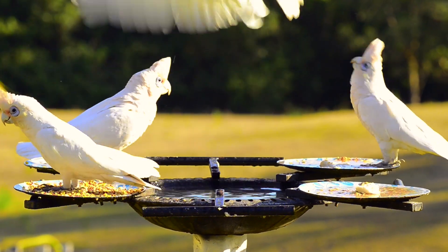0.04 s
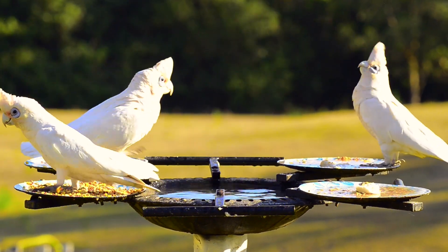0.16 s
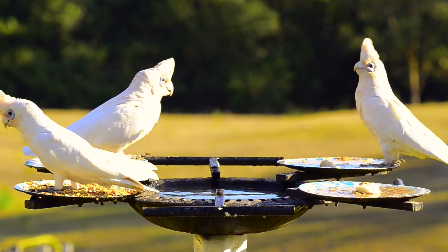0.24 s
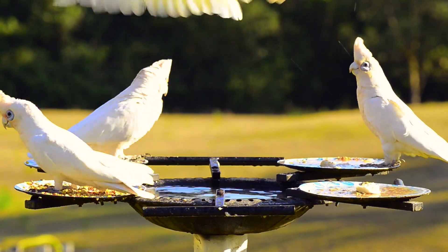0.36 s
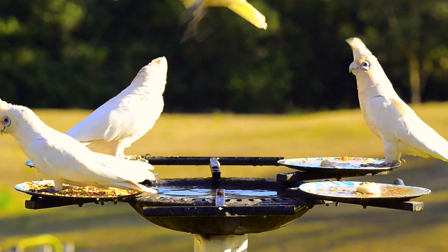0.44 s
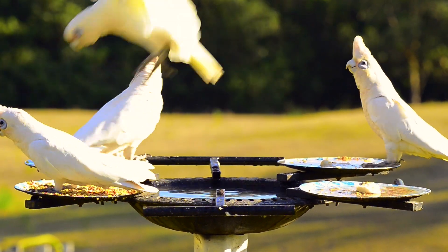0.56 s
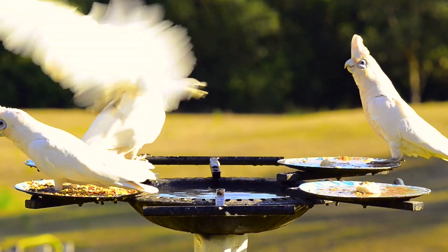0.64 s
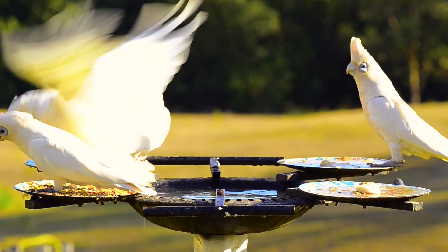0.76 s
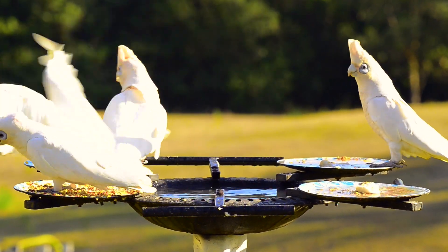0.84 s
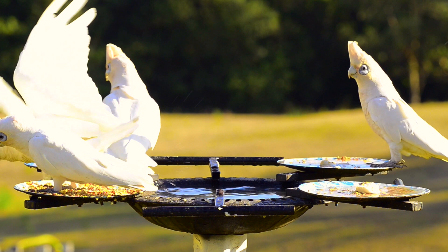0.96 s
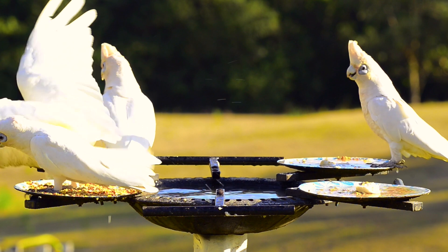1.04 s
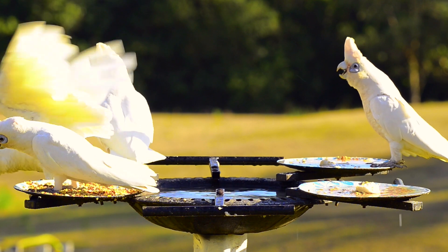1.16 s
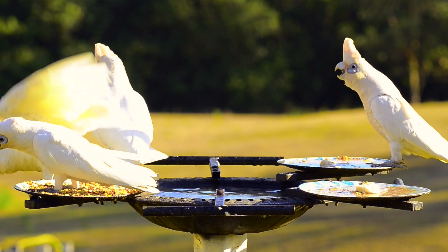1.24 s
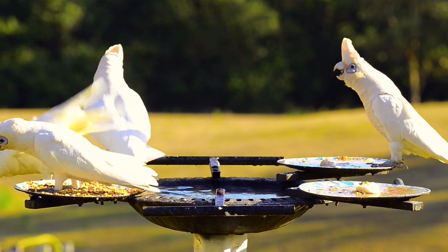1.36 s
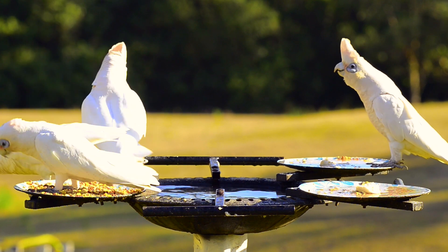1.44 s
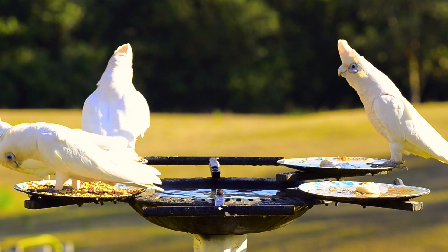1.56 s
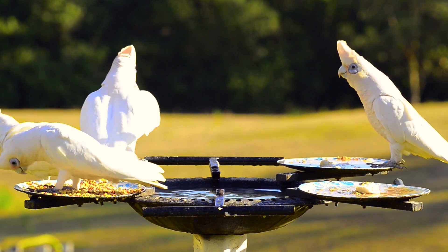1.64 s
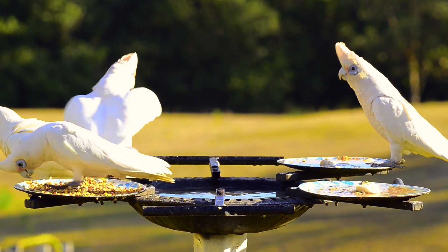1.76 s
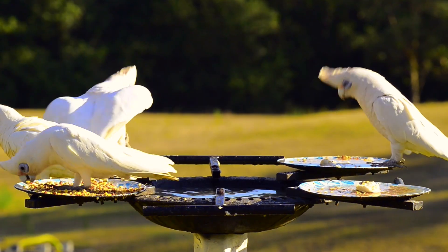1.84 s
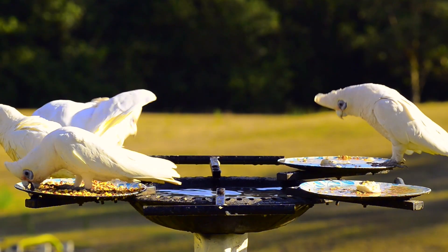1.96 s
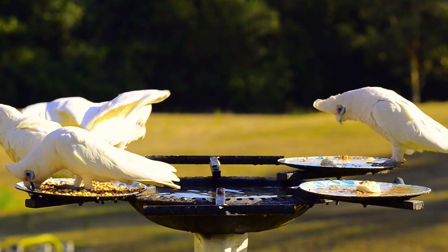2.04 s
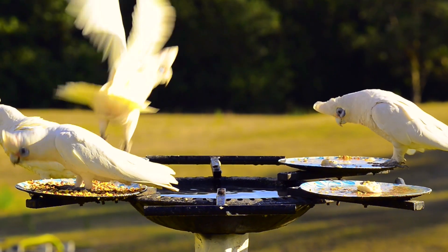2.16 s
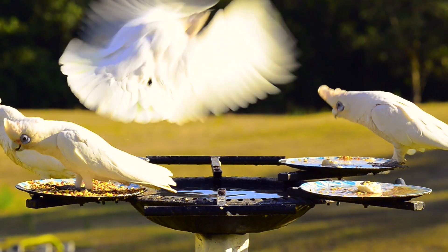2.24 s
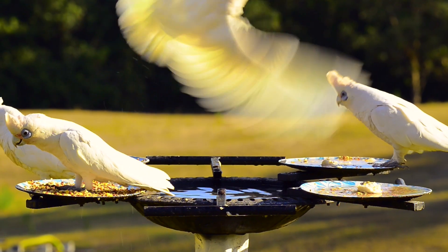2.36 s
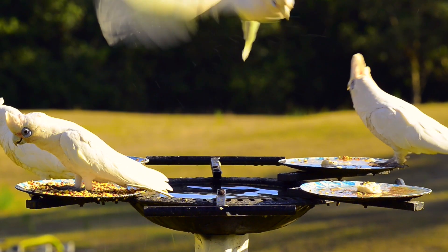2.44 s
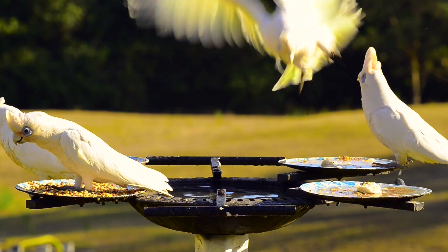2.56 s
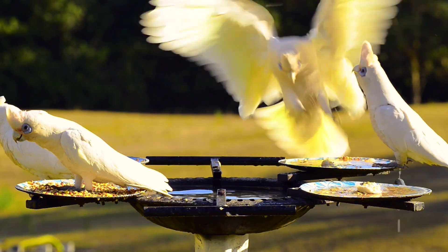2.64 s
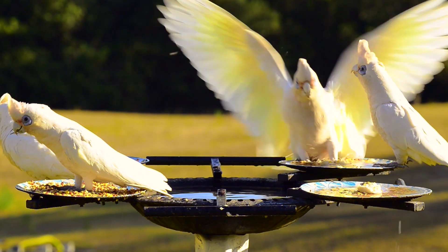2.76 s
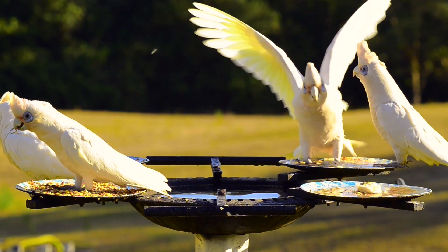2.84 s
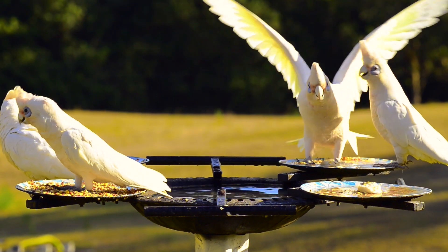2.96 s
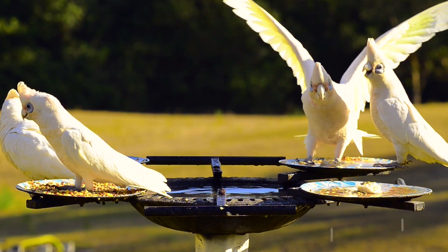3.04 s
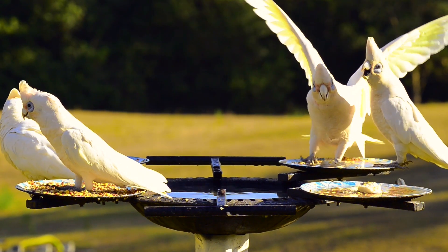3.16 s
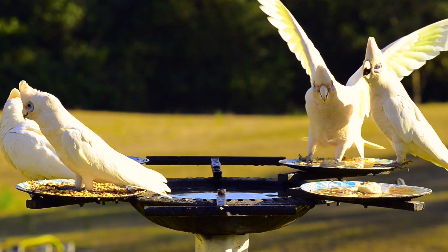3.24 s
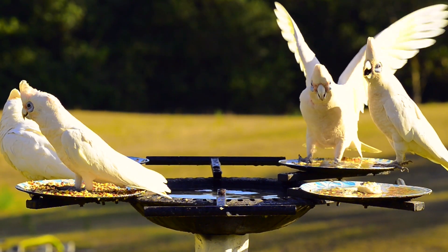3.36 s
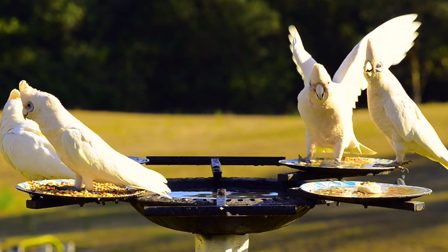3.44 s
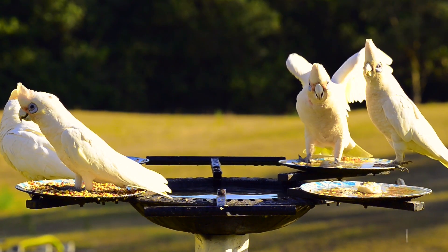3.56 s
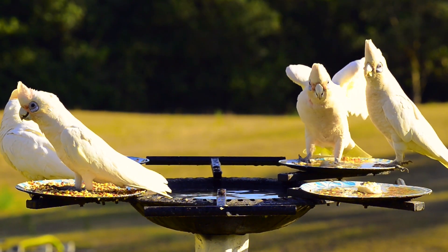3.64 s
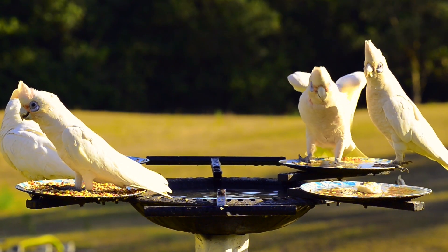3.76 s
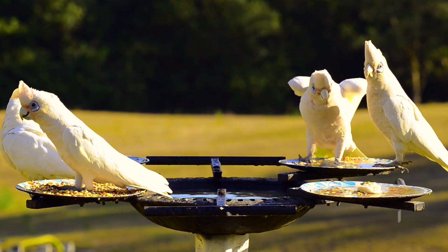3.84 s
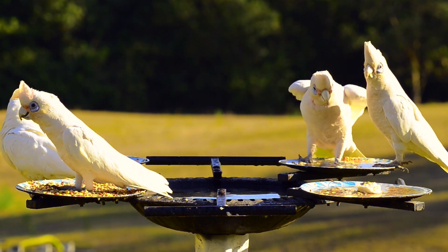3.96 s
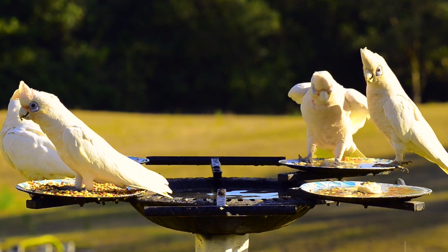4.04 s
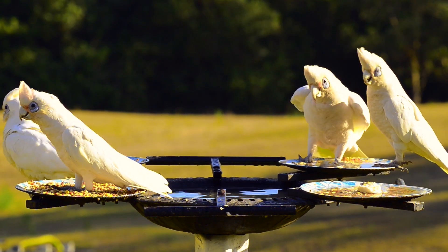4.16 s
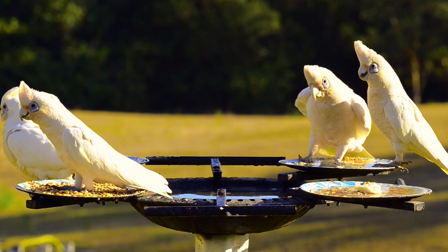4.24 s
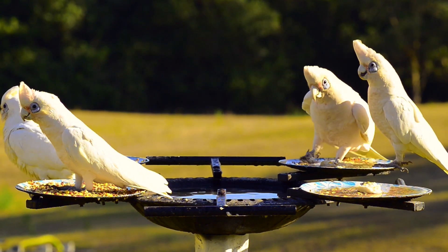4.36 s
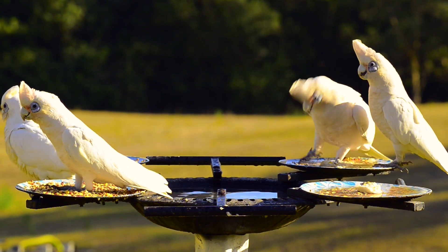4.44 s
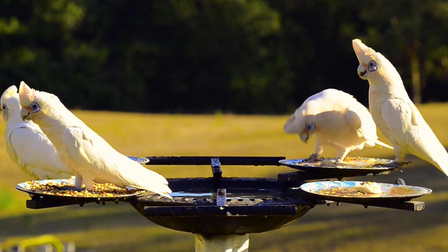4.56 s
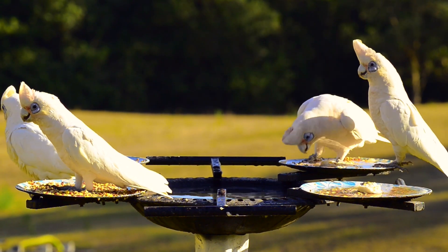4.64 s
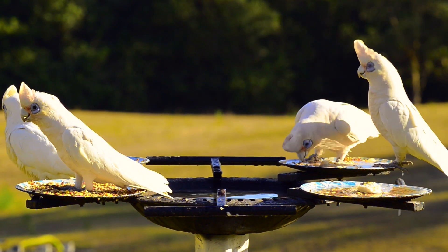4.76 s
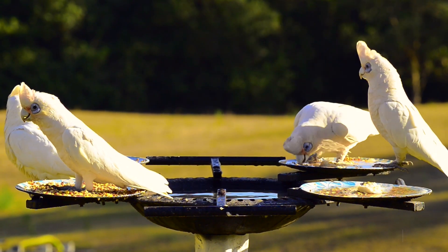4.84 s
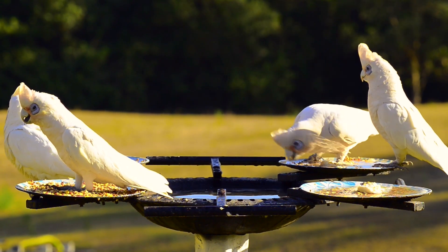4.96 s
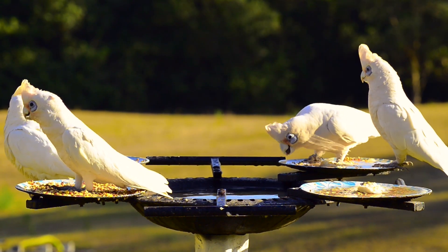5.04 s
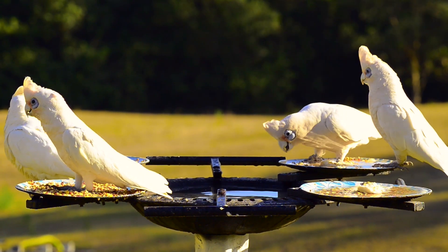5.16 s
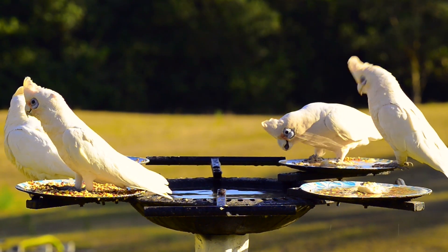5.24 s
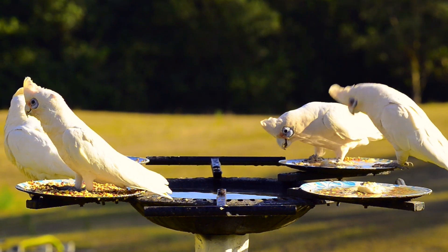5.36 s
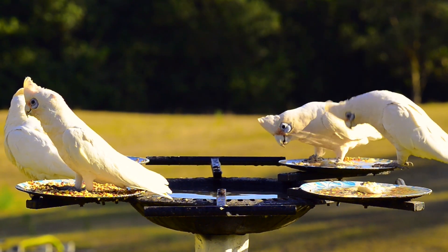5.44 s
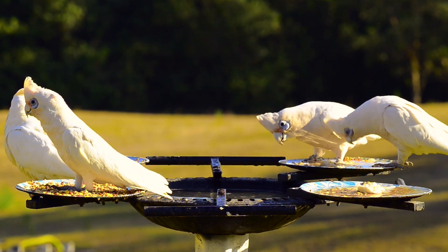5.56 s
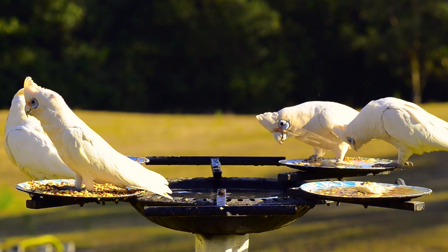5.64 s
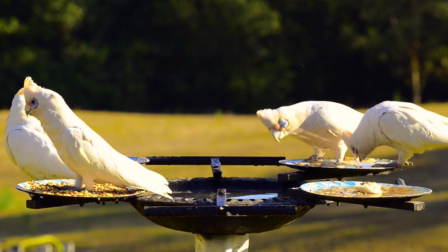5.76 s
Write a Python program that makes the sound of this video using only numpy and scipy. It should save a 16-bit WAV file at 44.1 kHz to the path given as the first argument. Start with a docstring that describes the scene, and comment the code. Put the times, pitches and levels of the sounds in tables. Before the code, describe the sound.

Outdoors at a bird feeder, cockatoos screech close to the microphone over a quiet hiss and soft rumble. Chirps come first, then a strong hoarse cry, a run of clear whistles, and the longest, loudest screech mid-way. Low gust thumps follow, the heaviest after four seconds, with one weaker cry, then faint chirps and rasps.

```python
"""Cockatoos screech around a garden feeder over a soft wind rumble, a quiet floor and a short echo.
At first a tail of a screech, faint hoots, hoarse rasps and chirps; then screeches built from warbling voice lines.
From about 1.1 s an insect trills in pulses, then whistles and glides come as bending near-pure notes, then low peeps.
Wing gusts thump the microphone as low rings from 2.5 s; the longest screech starts near 2.7 s, the last near 4.6 s.
Late chirps and rasps, made of tones and of tones smeared by noise, close the scene."""
import sys
import numpy as np
from scipy import signal
from scipy.fft import rfft, irfft
from scipy.io import wavfile
from scipy.ndimage import uniform_filter1d

SR = 44100
rng = np.random.default_rng(int(sys.argv[2]) if len(sys.argv) > 2 else 0)


def unload_wav(signal):
    """Save mono or channel-first audio to the path in sys.argv[1] as 16-bit WAV at rate SR, clipped to [-1, 1]."""
    wavfile.write(
        sys.argv[1],
        SR,
        np.round(np.clip(np.atleast_2d(signal).T, -1, 1) * 32767).astype(np.int16),
    )


N = 255780  # length in samples


def undb(db):
    """Turn decibels into a gain."""
    return 10 ** (np.asarray(db) / 20)


def unit(x):
    """Scale a sound to an rms (average strength) of 1."""
    return x / np.sqrt(np.mean(x ** 2))


def band(x, lo_hz, hi_hz):
    """Keep mainly what lies between two frequencies."""
    return signal.sosfilt(signal.butter(2, [lo_hz, hi_hz], "bandpass", fs=SR, output="sos"), x)


def wander(n, rate):
    """A smooth random curve of rms 1 that changes about `rate` times a second."""
    width = max(int(SR / rate), 2)
    once = uniform_filter1d(rng.standard_normal(n), width)
    return unit(uniform_filter1d(once, width))


def shaped(points):
    """Noise of rms 1 whose spectrum follows the given points."""
    hz, db = np.transpose(points)
    f = np.maximum(np.fft.rfftfreq(N, 1 / SR), 1)
    gain = undb(np.interp(np.log(f), np.log(hz), db))
    return unit(irfft(rfft(rng.standard_normal(N)) * gain, N))


# The pitch the screeching voice settles to. Each row: time in seconds, pitch in Hz.
SETTLED_PITCH = [(0, 737), (0.07, 711), (0.61, 629), (0.748, 700), (0.755, 706.4), (0.99, 752.8),
                 (1.19, 598), (1.27, 746.3), (1.5, 729.3), (1.78, 699), (2.71, 626), (2.95, 820),
                 (3.12, 744), (3.25, 909), (3.69, 685), (4.575, 613), (4.87, 707)]
# Where the voice breaks up or down. Each row: start in seconds, jump in Hz.
VOICE_BREAKS = [(0.775, -63), (0.806, 105), (0.897, -101), (0.942, 23), (1.3, 31), (1.334, -83),
                (1.352, 63.5), (1.386, -59.5), (1.52, 40.5), (1.554, 28.5), (1.587, -35), (1.677, -34.5),
                (1.702, 56.5), (2.779, -85), (2.819, -36), (2.845, -65), (2.959, -47), (2.997, 31),
                (3.022, -76), (3.074, -85.5), (3.145, -87), (3.215, -74), (3.271, -100), (3.294, 29),
                (3.337, -91), (3.468, 34.5), (3.491, -64), (3.524, 40), (3.56, -49), (3.601, 30.5),
                (4.655, -49.5), (4.673, 99.5), (4.706, -127), (4.773, -73.5), (4.822, 39)]


def screech_pitch(t, break_s=.02, settle_s=.1):
    """Pitch in Hz: the settled pitch plus breaks that ramp in and then die away."""
    start_s, jump_hz = np.transpose(VOICE_BREAKS)
    late = t - start_s[:, None]
    ramp = np.clip(late / break_s, 0, 1)
    die_away = np.exp(-np.maximum(late - break_s, 0) / settle_s)
    settled = np.interp(t, *np.transpose(SETTLED_PITCH))
    return uniform_filter1d(settled + jump_hz @ (ramp * die_away), 260)


# How hard the bird cries: one list per screech. Each row: time in seconds, level in dB,
# second line in dB, brightness in dB per octave, beak resonance in Hz.
SCREECH_EFFORT = [
    [(0, -35, -2.5, 2.5, 2180), (0.09, -56, 2.5, -16, 2100)],
    [(0.6, -61, 10, -9, 2750), (0.63, -43.5, -12, -23, 2470), (0.748, -40.5, -3.5, -7, 2040)],
    [(0.752, -40, 11, -1, 2140), (0.765, -30, 5, -28, 2200), (0.805, -27, -3.5, -4.5, 2390),
     (0.83, -22, 0.5, 1.5, 2200), (0.89, -26.5, -2, 9, 2302), (0.92, -26, -9.5, 6.5, 2820),
     (0.985, -25, 4.5, 6, 2680), (0.997, -25, -1, 0, 2660)],
    [(1.187, -43, -15, -14.5, 3030), (1.208, -27, -13, -6, 3100), (1.235, -27.5, -3.5, -6.5, 3000),
     (1.27, -16, -10, -2, 2820), (1.335, -15.5, -8.5, -13.5, 2535), (1.395, -22, -13.5, 0.5, 2410),
     (1.42, -18, -7, 0, 2700), (1.475, -22.5, -2, -3, 2230), (1.505, -25, -6.5, -3.5, 2750),
     (1.65, -22, -7.5, -10, 2272), (1.725, -24, -0.5, -1, 2620), (1.77, -24, 5.5, -4, 2217),
     (1.785, -53, -8, 4.5, 2500)],
    [(2.69, -64, 9, -10.5, 2770), (2.74, -43, -5.5, -19, 2630), (2.85, -26.5, -17.5, -0.5, 2400),
     (2.95, -18, -4, 4, 2648), (3.06, -23, -7.5, 1, 2970), (3.11, -20, -11, -3.5, 3050),
     (3.165, -32, 4.5, 5, 2930), (3.21, -15, -14, -1.5, 3100), (3.27, -14.5, -7.5, -7, 2600),
     (3.33, -19, -19.5, 1.5, 2570), (3.44, -17, -6, 3, 2780), (3.53, -19, -9.5, -0.5, 2732),
     (3.6, -16.5, -11, 1.5, 2975), (3.65, -20.5, -3, 6, 2470), (3.69, -35, 1.5, 1, 2796)],
    [(4.57, -45.5, -25, 0, 3011), (4.6, -34.5, -33, -13, 2740), (4.665, -35.5, -30, -9, 2600),
     (4.69, -32.5, -2.5, -12.5, 2720), (4.8, -30.5, -22.5, -14, 2620), (4.85, -30.5, -3.5, -12.5, 2758),
     (4.885, -45.5, 5, -16, 2996)],
]
# The mix of each screech at its loudest. Each row: lowest line in dB, rasp in dB, shrill lines in dB.
SCREECH_MIX = [(-28, -14.5, -10), (3, -12, -10), (-6, -25.5, -13), (-12, -23, 21.5), (-13.5, -24, 11.5),
               (-34.5, -25, -8)]
# How the throat colours the voice. Each row: frequency in Hz, gain in dB.
THROAT_GAIN = [(590, -53), (1000, 1.5), (1520, 11), (1780, -2.5), (2210, 5.5), (2870, -3.5), (3320, 0.5),
               (5170, -4.5), (5600, -12.5), (8230, -18), (8810, -23), (9750, -27), (10900, -41.5),
               (13400, -44.5), (15000, -49.5)]
# Spells where the voice turns hoarse. Each row: middle in seconds, half width in seconds, added rasp in dB.
HOARSE_SPELLS = [(.95, 0.051, 8.5), (1.389, 0.058, 6.5), (1.5, 0.032, 13), (2.88, 0.061, 6.5),
                 (3.38, .05, 7.5), (4.7, .03, 12)]


def screeches(jitter=0.0044, peak_db=8.5, peak_width=0.25, flutter_db=4.0, half_db=-14, air_db=-12):
    """A warbling stack of lines through the throat; rasp smears each line, wakes half-pitch lines and leaks air."""
    low_rise, rasp_rise, shrill_fall = 0.58, 0.68, 1.2  # dB gained, gained and lost per dB under the loudest
    beak_drift = 0.017  # spread of the beak resonance, as a share of it
    shrill_hz, shrill_width_hz = 12100, 1300  # a band of lines that comes out at full cry
    out, t = np.zeros(N), np.arange(N) / SR
    pitch = screech_pitch(t)
    phase = 2 * np.pi * np.cumsum(pitch * (1 + jitter * wander(N, 270))) / SR
    air = band(shaped(THROAT_GAIN), 770, 9000) * (1 + np.cos(phase))  # breath pulses with the voice
    throat_hz, throat_db = np.transpose(THROAT_GAIN)
    for rows, (low_db, rasp_db, shrill_db) in zip(SCREECH_EFFORT, SCREECH_MIX):
        s, *columns = np.transpose(rows)
        at = slice(int(s[0] * SR), int(s[-1] * SR))
        now = t[at]
        db, second_db, bright_db, beak_hz = (np.interp(now, s, c) for c in columns)
        # a weaker voice is rougher and leans on its lowest line
        under_db = db.max() - db
        low_db = low_db + low_rise * under_db
        rasp_db = rasp_db + rasp_rise * np.minimum(under_db, 18)
        for middle_s, half_s, add_db in HOARSE_SPELLS:
            rasp_db += add_db * np.exp(-((now - middle_s) / half_s) ** 2)
        shrill_db = shrill_db - shrill_fall * under_db
        centre_hz = beak_hz * (1 + beak_drift * wander(len(db), 17))

        shaken = phase[at] + undb(rasp_db) * wander(len(db), 377)
        voice = undb(low_db) * np.sin(shaken) + undb(second_db) * np.sin(2 * shaken)
        voice = np.sqrt(2) * voice + undb(rasp_db + air_db) * air[at]
        lines, power = 0, 0
        for k in [1.5, 2.5, 3.5, 4.5, *range(3, 21)]:  # multiples of the pitch
            hz = k * pitch[at]
            gain_db = np.interp(np.log(hz), np.log(throat_hz), throat_db)
            gain_db += flutter_db * wander(len(hz), 43)
            gain_db += peak_db * np.exp(-(np.log(hz / centre_hz) / peak_width) ** 2)  # the beak moves one resonance
            gain_db += bright_db * np.clip(np.log2(hz / 2800), 0, 1.3)
            if k % 1:
                gain_db += rasp_db + half_db  # rasp wakes the half-pitch lines
            gain_db += shrill_db * np.exp(-((hz - shrill_hz) / shrill_width_hz) ** 2)
            slip = undb(rasp_db) * k / 3 * wander(len(hz), 560)  # uneven cycles blur high lines most
            lines = lines + undb(gain_db) * np.cos(k * phase[at] - k * k * 0.38 + slip)
            power = power + undb(2 * gain_db) / 2 * (hz < 3900)
        even_lines = lines / np.sqrt(uniform_filter1d(power, 800))  # lines below 3900 Hz set the level

        since_start = now - s[0] + (s[0] == 0)  # a cry already sounding at zero gets no fade-in
        edge = np.clip(np.minimum(since_start, s[-1] - now) / .006, 0, 1)
        out[at] += undb(db) * edge * (voice + even_lines)
    return out


# Soft wind rumble, around which the level wavers. Each row: time in seconds, level in dB.
RUMBLE = [(0, -67), (.3, -69), (1.0, -74), (1.7, -66.5), (1.9, -54), (2.6, -60), (3.2, -63), (4.0, -67.5),
          (5.0, -70.5), (5.8, -68.5)]
# Wing gusts on the microphone. Each row: start in seconds, strength in dB, ring in Hz.
WING_GUSTS = [(2.469, -55, 158), (2.816, -52, 122), (2.913, -39, 123.3), (2.996, -35.5, 126),
              (3.343, -49, 149), (3.466, -32, 124.4), (4.185, -28.5, 145.5), (4.249, -31, 131),
              (4.299, -16.5, 118.4), (4.326, -27, 126), (4.46, -28, 144), (4.521, -31.5, 125),
              (4.607, -47, 113.5), (4.787, -52, 96.9), (4.858, -38, 105), (4.872, -45.5, 177.4)]


def wind(gust_s=0.099, sweep=0.16, knock=0.35):
    """Each gust swings the microphone for a few low cycles; a soft noise rumble runs under them."""
    t = np.arange(N) / SR
    rumble_db = np.interp(t, *np.transpose(RUMBLE)) + 3.0 * wander(N, 14)
    out = unit(band(rng.standard_normal(N), 50, 260)) * undb(rumble_db)
    buffet = unit(band(band(rng.standard_normal(N), 60, 245), 60, 245))
    for s, db, hz in WING_GUSTS:
        i = int(s * SR)
        u = np.linspace(0, 6, int(gust_s * SR))
        phase = 2 * np.pi * np.cumsum(hz * (1 + sweep * wander(len(u), 90))) / SR
        swell = u * np.exp(1 - u) * (1 - u / u[-1])  # quick rise, slower fall to nothing
        out[i:i + len(u)] += undb(db) * swell * (np.sin(phase) + knock * buffet[i:i + len(u)])
    return out


# Colour of the quiet floor. Each row: frequency in Hz, relative strength in dB per Hz.
FLOOR_COLOUR = [(180, -41.5), (300, -6.5), (913, -3), (1490, -12), (1880, -10), (3440, -13.5), (3790, -6.5),
                (4250, -12), (5900, -17.5), (6400, -26.5), (15000, -26)]


def quiet_floor():
    """Steady coloured noise, mostly shared by both channels, with a slight waver in level."""
    mid, side = shaped(FLOOR_COLOUR), shaped(FLOOR_COLOUR)
    level = undb(-61.5 + 0.5 * wander(N, 8))
    return level * (mid + .2 * side * np.array([[1], [-1]]))


def garden_echo(x, t60_s=.6, gap_s=.01, end_s=.15, wide=0.0057):
    """Echo as patchy fading noise, nearly alike in both channels; it fades slowly at first, then faster."""
    t = np.arange(SR // 2) / SR
    fade_db = -60 * t / t60_s - 12 * (t / end_s) ** 3 + 4.0 * wander(len(t), 60)
    fade = undb(fade_db) * (t > gap_s)
    mid, side = (band(rng.standard_normal(len(t)), 900, 6600) * fade for _ in range(2))
    scale = 1 / np.sqrt(np.sum(mid ** 2))
    return np.array([signal.fftconvolve(x, scale * (mid + sign * wide * side))[:N] for sign in (1, -1)])


def sing(rows, bend, arch, place, rough):
    """Gliding near-sines with overtones; in rough ones turbulent air smears each line into a band.

    Each row: start s, length s, start Hz, end Hz, peak dB, octave dB. bend: share of the glide done at 40%
    of the note; arch: rise over the glide; place: where the peak lies, 0-1; rough: roughness, 0-1."""
    out = np.zeros((2, N))
    for s, length, start, end, db, octave_db in rows:
        middle = (start + bend * (end - start)) * (1 + arch)
        # faint birds sit further out, to either side but more to the left
        pan_db = .45 * max(-22 - db, 0) * rng.uniform(-0.49, 1)
        i = int(s * SR)
        u = np.linspace(0, 1, min(int(length * SR), N - i))
        hz = uniform_filter1d(np.interp(u, [0, .4, 1], [start, middle, end]), len(u) // 5, mode="nearest")
        phase = 2 * np.pi * np.cumsum(hz) / SR
        rough = np.clip(rough, .01, 1)
        peak = np.clip(place, .05 + .4 * rough, .95)
        rise_fall = np.minimum(u / peak, (1 - u) / (1 - peak))
        swell = np.sin(np.pi / 2 * rise_fall) ** (.7 + rough)
        swell *= undb(2.0 * wander(len(u), 210))  # the level shakes
        noisy = min(2 * rough, 1)
        tone = 0
        for k, line_db in ((1, 0), (2, octave_db), (3, 1.55 * octave_db - 19), (4, 1.8 * octave_db - 25)):
            rate = 150 + .25 * rough * k * middle
            smear = (wander(len(u), rate) + 1j * wander(len(u), rate)) / np.sqrt(2)
            line = np.imag((1 - noisy + noisy * smear) * np.exp(1j * k * phase))
            tone += undb(line_db) * (k * middle < 14000) * line
        sides = undb(db + np.array([[pan_db], [-pan_db]]) / 2)
        out[:, i:i + len(u)] += np.sqrt(2) * swell * tone * sides
    return out


# An even run of faint hoots. Each entry: start in seconds.
HOOT_STARTS = [.06, .156, .24, .332, .42, .51]


def hoots():
    """Short low arched notes whose octave is stronger than the lowest line."""
    rows = [(s, 0.036, 515, 515, -59.5, 4.5) for s in HOOT_STARTS]
    return sing(rows, bend=0, arch=.125, place=.4, rough=.25)


# Hoarse bursts. Each row: start in seconds, length in seconds, pitch in Hz, peak in dB, octave in dB.
RASP_NOTES = [(.071, .11, 5520, -53.5, -14.5), (0.17, 0.058, 2030, -54, -16),
              (.3, 0.067, 1900, -59.5, -1.5), (.19, 0.058, 1300, -56.5, 4), (5.7, .12, 2300, -57, 9),
              (5.66, .1, 4300, -53, -14), (2.235, 0.083, 2270, -51, -32.5), (2.653, 0.21, 2460, -43.5, -1),
              (4.109, 0.077, 2670, -50.5, 9), (4.982, 0.11, 2320, -50.5, 6),
              (5.228, 0.12, 4540, -47, -12.5), (5.288, .11, 2520, -45, -11), (5.418, 0.12, 2390, -55.5, 16),
              (5.437, 0.15, 3470, -46.5, -17), (5.659, .2, 3220, -42.5, -9.5),
              (5.637, .27, 6030, -52.5, -41)]


def rasps():
    """Bursts around one pitch, so rough that each line is all smeared noise."""
    rows = [(s, length, hz, hz, db, octave_db) for s, length, hz, db, octave_db in RASP_NOTES]
    return sing(rows, bend=0, arch=.02, place=.4, rough=.7)


# Arched notes with overtones. Each row: start in seconds, length in seconds, start pitch in Hz,
# end pitch in Hz, peak in dB, octave in dB.
CHIRP_NOTES = [(.2, 0.1, 1585, 1434, -43, -5), (0.279, 0.024, 1770, 1885, -33.5, -5),
               (0.299, 0.013, 1870, 1490, -41, -1), (0.421, 0.045, 2260, 2560, -40, -8),
               (0.426, 0.092, 3046, 3440, -34.5, -15.5), (0.469, 0.053, 3824, 3545, -25, -31),
               (0.497, 0.043, 2952, 2882, -27, -6), (.54, 0.031, 2940, 3246, -26, -7),
               (.545, .035, 2490, 1910, -39.5, -24), (0.562, 0.045, 4040, 4120, -21, -18.5),
               (0.586, 0.13, 4218, 4350, -39, -10), (1.841, 0.046, 4880, 5005, -28.5, -40),
               (4.797, 0.17, 1602, 1345, -34.5, -7.5), (5.185, 0.097, 1590, 2015, -46, -22),
               (5.308, 0.018, 4830, 5260, -36, -13), (5.333, 0.018, 3580, 3900, -40, -8),
               (5.357, 0.024, 3830, 3080, -36, -6.5), (5.404, 0.049, 3854, 3900, -25.5, -17),
               (5.447, 0.031, 2700, 2890, -35, .5)]


def chirps():
    """Short arched notes with overtones, slightly rough and loudest early on."""
    return sing(CHIRP_NOTES, bend=.55, arch=.0251, place=.29, rough=.13)


# The insect's trill: one list per spell. Each row: time in seconds, level in dB.
TRILL_SPELLS = [
    [(1.1, -62), (1.4, -54), (1.9, -53), (2.0, -70)],
    [(4.0, -75), (4.3, -62), (4.45, -70)],
    [(4.85, -72), (4.95, -61), (5.2, -60), (5.25, -72)],
]


def insect(hz=6130, throbs_hz=42.5):
    """A high, slightly unsteady tone chopped into short pulses of uneven strength."""
    t, level = np.arange(N) / SR, np.zeros(N)
    for rows in TRILL_SPELLS:
        s, db = np.transpose(rows)
        level += undb(np.interp(t, s, db, left=-120, right=-120) + 2.5 * wander(N, 25))
    pulse = np.maximum(np.sin(2 * np.pi * throbs_hz * t), 0) ** 2
    tone = np.sin(2 * np.pi * hz * t + 0.64 * wander(N, 200))
    return np.sqrt(5) * level * pulse * tone


# Pure notes that move quickly to their pitch. Each row: start in seconds, length in seconds,
# start pitch in Hz, end pitch in Hz, peak in dB, octave in dB.
WHISTLE_NOTES = [(1.563, 0.051, 4900, 5004, -25.5, -52), (1.755, 0.11, 4510, 4250, -21.5, -51),
                 (1.965, 0.089, 5150, 4690, -16, -70), (2.11, 0.068, 4550, 3997, -32, -27),
                 (2.155, 0.093, 4693, 4440, -20.5, -81), (2.328, 0.074, 4490, 3997, -24.5, -55),
                 (2.48, .055, 3920, 3473, -22.5, -43.5), (2.564, .032, 4450, 3770, -24, -64),
                 (4.422, 0.031, 4610, 3250, -40.5, -44.5)]


def whistles():
    """Near-pure notes that do most of their glide early and then hold."""
    return sing(WHISTLE_NOTES, bend=.92, arch=.012, place=.5, rough=.094)


# Pure notes that glide evenly. Each row: start in seconds, length in seconds, start pitch in Hz,
# end pitch in Hz, peak in dB.
GLIDE_NOTES = [(1.644, 0.11, 5800, 4940, -23.5), (2.946, .44, 1746, 2120, -40),
               (3.163, 0.69, 1652, 2010, -40), (3.402, 0.37, 1465, 1592, -43),
               (3.816, 0.062, 4210, 3580, -38.5), (3.818, 0.068, 3200, 2240, -54),
               (3.973, 0.025, 3400, 2360, -45), (4.033, 0.061, 5280, 4890, -53.5),
               (4.045, 0.061, 3932, 3770, -53.5), (4.365, 0.069, 5497, 5630, -48.5),
               (4.913, 0.022, 4000, 2700, -38.5), (5.177, .02, 4620, 2600, -42.5),
               (5.359, 0.11, 2390, 1700, -63), (3.868, 0.027, 3270, 2420, -41.5)]


def glides():
    """Near-pure notes that slide evenly up or down, with a very weak octave."""
    rows = [(*row, -51.5) for row in GLIDE_NOTES]
    return sing(rows, bend=.45, arch=.014, place=.35, rough=.18)


# Faint low peeps. Each row: start in seconds, length in seconds, pitch in Hz, peak in dB.
PEEP_NOTES = [(2.204, 0.057, 1060, -50.5), (2.303, 0.064, 753, -47.5), (2.367, 0.043, 1080, -49.5),
              (2.48, 0.043, 1228, -56), (2.555, .09, 782, -50.5), (3.889, 0.027, 1093, -46),
              (3.891, 0.043, 1410, -58), (4.087, 0.055, 1340, -61), (4.089, 0.11, 1083, -57)]


def peeps():
    """Low, partly rough notes that arch a little around one pitch and peak early."""
    rows = [(s, length, hz, hz, db, -22) for s, length, hz, db in PEEP_NOTES]
    return sing(rows, bend=0, arch=.04, place=.2, rough=.3)


def scene():
    """Birds with their echo, insect, wind and the quiet floor."""
    cockatoos = screeches()
    small_birds = hoots() + rasps() + chirps() + whistles() + glides() + peeps()
    echo = garden_echo(undb(-14.5) * cockatoos + undb(-8.5) * small_birds.mean(axis=0))
    return cockatoos + small_birds + echo + insect() + wind() + quiet_floor()


def record(dry):
    """Cut the lowest bass gently and the top above 15500 Hz steeply."""
    dry = signal.sosfilt(signal.butter(3, 65, "highpass", fs=SR, output="sos"), dry)
    return signal.sosfilt(signal.ellip(8, .2, 80, 15500, fs=SR, output="sos"), dry)


dry = scene()
out = record(dry)
unload_wav(out)
```